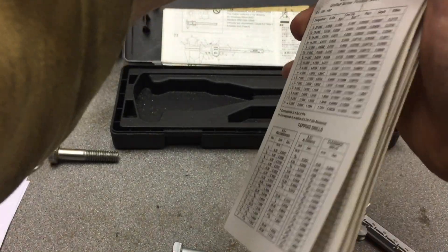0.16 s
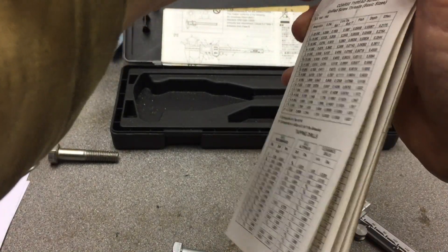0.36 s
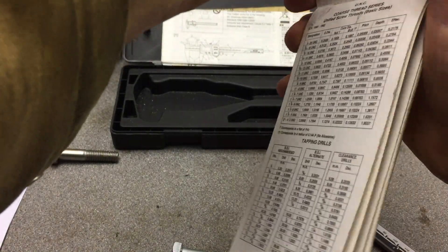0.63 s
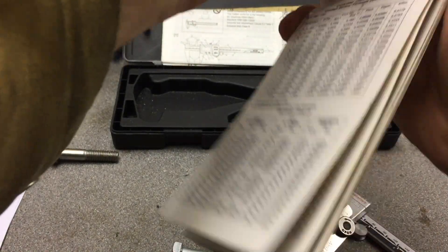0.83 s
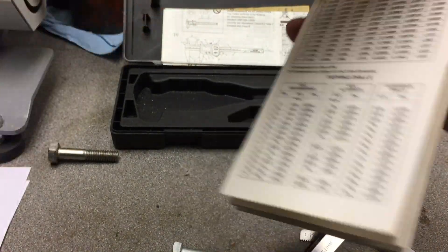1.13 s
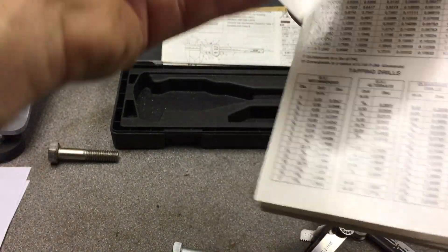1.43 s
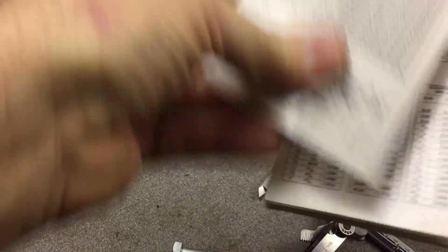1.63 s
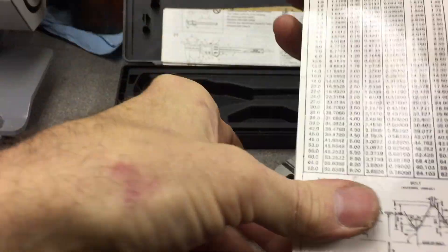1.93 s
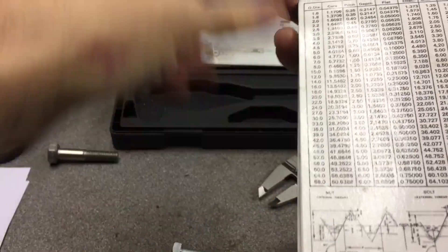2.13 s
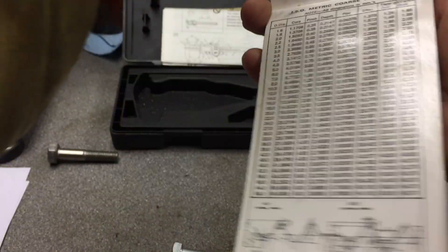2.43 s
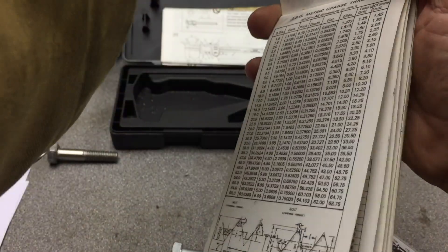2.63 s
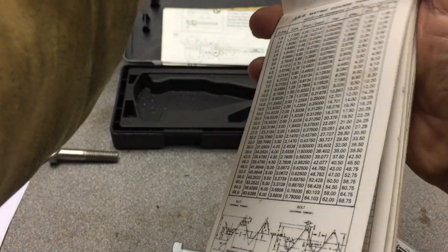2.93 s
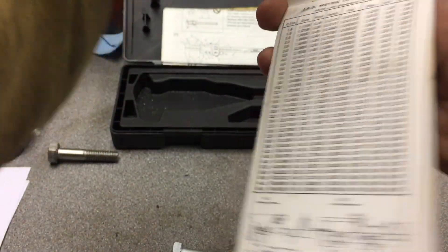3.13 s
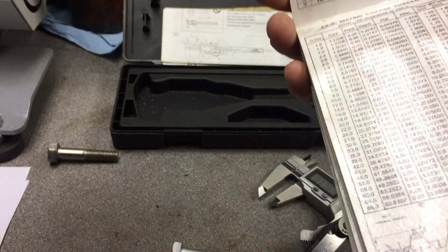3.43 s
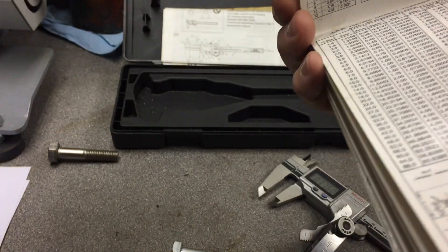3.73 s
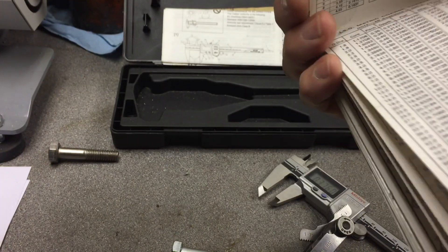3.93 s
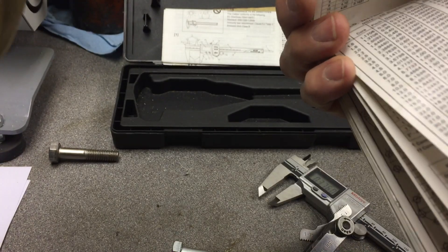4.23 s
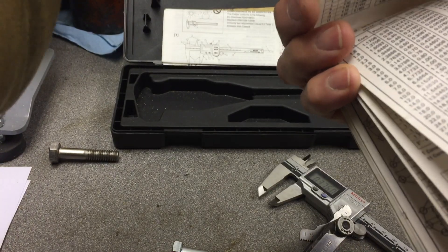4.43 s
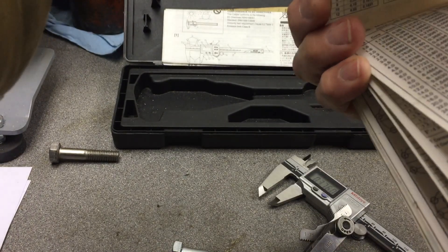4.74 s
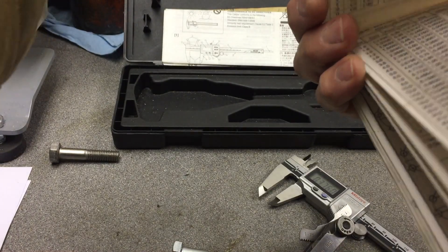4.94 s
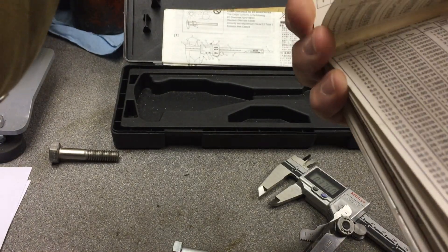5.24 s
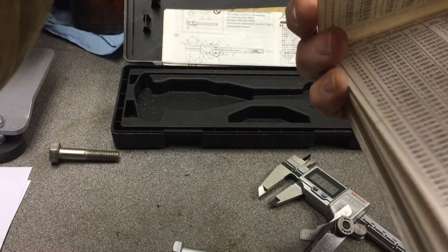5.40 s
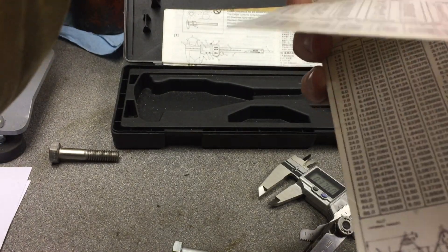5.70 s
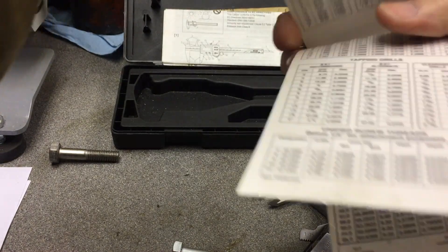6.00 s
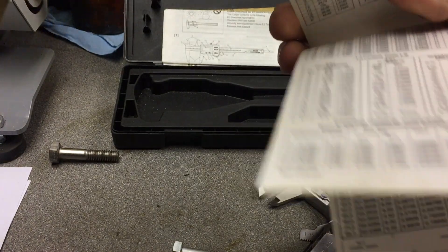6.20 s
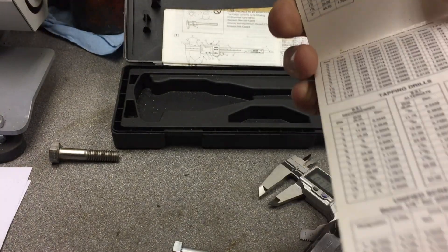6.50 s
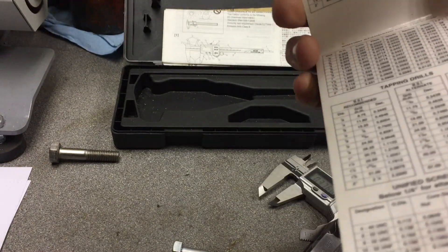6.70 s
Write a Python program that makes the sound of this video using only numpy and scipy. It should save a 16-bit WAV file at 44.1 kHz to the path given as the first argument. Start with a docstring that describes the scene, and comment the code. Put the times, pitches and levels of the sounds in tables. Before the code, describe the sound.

Thick pages slide, crackle and flap in short uneven strokes, heard close and dry with only a slight short room echo. A muffled buckle pops early, brisk scrapes follow, then a lull. Rustling resumes and thickens, with a hard snap and thump past the middle and more sharp ticks, before one loud dull pop and a few last rubs. Very quiet air noise and low hum lie beneath.

```python
"""A quiet workshop, where a stiff paper booklet is leafed through close to a microphone.
Thumbs and pages slide in short strokes (noise with crackle, coloured by the ringing sheet), pages flap air
(decaying low sines), paper snaps or scuffs briefly (short noise bursts) and bent sheets buckle (dull noise
bursts). Ventilation (shaped noise) and mains hum (wavering sines) fill the room, whose walls return an echo."""
import sys
import numpy as np
from scipy import signal
from scipy.fft import rfft, irfft, next_fast_len
from scipy.io import wavfile
from scipy.ndimage import uniform_filter1d, map_coordinates

SR = 44100
rng = np.random.default_rng(int(sys.argv[2]) if len(sys.argv) > 2 else 0)


def persist_wave(psi):
    """Save psi, clipped to +-1, as 16-bit WAV."""
    counts = np.round(np.clip(psi, -1, 1) * 32767).astype(np.int16)
    wavfile.write(sys.argv[1], SR, np.atleast_2d(counts).T)


N = 302526  # length [samples]


def amp(db):
    """Decibel law: the amplitude gain of a level in dB."""
    return 10 ** (np.asarray(db) / 20)


def unit(x):
    """Power normalisation: x scaled to rms 1."""
    return x / np.sqrt(np.mean(x ** 2, axis=-1, keepdims=True) + 1e-20)


def along(points, hz):
    """Logarithmic frequency scale: (Hz, value) points are joined by straight lines on it."""
    f, v = np.transpose(points)
    return np.interp(np.log(hz + 1), np.log(f + 1), v)


def wobble(rate):
    """Slow random modulation: a smooth curve through rate random knots a second."""
    knots = rng.standard_normal(int(N * rate / SR) + 4)
    return map_coordinates(knots, [np.arange(N) * rate / SR])


def filtered(x, response):
    """Linear filtering: the spectrum of x times a response of frequency."""
    m = next_fast_len(N + 8192)
    return irfft(rfft(x, m) * response(np.fft.rfftfreq(m, 1 / SR)), m)[..., :N]


def below(hz, edge_hz):
    """Low-pass law: a share near 1 under a soft edge and near 0 over it."""
    return 1 / (1 + (hz / edge_hz) ** 12)


def add(track, s, sound):
    """Superposition: a sound is mixed in at time s."""
    at = round(s * SR)
    track[..., at:at + sound.shape[-1]] += sound


def burst(t, rise, t60):
    """Transient envelope: a square-law climb to 1 over rise, then exponential decay by 60 dB in t60."""
    rise = max(rise, 1 / SR)
    climb = (t / rise) ** 2
    decay = amp(-60 * (t - rise) / max(t60, 1 / SR))
    return np.where(t < rise, climb, decay)


# Spectrum of the ventilation: (frequency [Hz], relative level per Hz [dB])
AIR_SPECTRUM = [(25, 0.5), (50, -6.5), (102, -2), (126, -12.5), (174, -4.5), (250, -12.5), (360, -14.5),
                (700, -20), (1400, -20), (2100, -19), (3000, -23), (4400, -23), (6000, -23.5), (15800, -33)]
# Partials of the mains hum: (frequency [Hz], peak level before wavering [dB], waver rate [1/s])
HUM_PARTIALS = [(49.7, -70.5, 8.5), (100.6, -66.5, 10)]
AIR_DB = -60.5  # rms level about which the ventilation drifts


def workshop():
    """Stationary sources: broadband flow noise, and hum partials modulated in level and phase."""
    drift_db = .5 * wobble(3)
    noise = rng.standard_normal(N)
    flow = unit(filtered(noise, lambda hz: amp(along(AIR_SPECTRUM, hz))))
    air = amp(AIR_DB + drift_db) * flow
    t, waver_db = np.arange(N) / SR, 2.5
    hum = np.zeros(N)
    for hz, db, rate in HUM_PARTIALS:
        level = amp(db + waver_db * wobble(rate))
        hum += level * np.sin(2 * np.pi * hz * t + 0.93 * wobble(rate))
    return air + hum


def patches(x, size, bins, frames, db):
    """Time-frequency modulation: random gain over patches of bins by frames, of standard deviation db."""
    z = signal.stft(x, nperseg=size)[2]
    field = rng.standard_normal(z.shape)
    field = uniform_filter1d(field, size=bins, axis=0)
    field = uniform_filter1d(field, size=frames, axis=1)
    return signal.istft(z * amp(db * field / field.std()), nperseg=size)[1]


def friction(grit_db, crackle_rate, crackle_db):
    """Stick-slip friction: fibres catch unevenly and crackle."""
    chance = crackle_rate * amp(3 * wobble(25)) / SR  # per sample; the crackling thickens and thins
    kicks = (rng.random(N) < chance) * amp(crackle_db + 3.2 * rng.random(N))
    crackle = signal.lfilter([1], [1, -.96], kicks)  # each crackle lasts about a millisecond
    grit = amp(grit_db * (wobble(700) + 0.51 * wobble(90)))
    fibres = rng.standard_normal(N) * (grit + crackle)
    # fine modes of the sheet, then broad colours of the contact
    fibres = patches(np.pad(fibres, (0, 2048)), size=1024, bins=2, frames=8, db=3.5)
    return patches(fibres, size=256, bins=3, frames=40, db=2.84)[:N]


# Colour of paper: (frequency [Hz], relative level per Hz [dB])
PAPER_SPECTRUM = [(180, -12), (300, -4.5), (700, -10.5), (1300, -7.5), (2000, -2.5), (3000, -6.5),
                  (5000, -12), (9000, -11), (13000, -21.5), (15800, -21.5)]
# Edges between belly, sheet, scrape and fizz: (belly top [Hz], sheet top [Hz], scrape top [Hz])
BAND_EDGES = (1200, 3200, 7000)


def paper_bands(x):
    """Band splitting: paper-coloured x as belly, sheet, scrape and fizz, each of rms 1."""
    def shares(hz):
        under = [0 * hz] + [below(hz, e) for e in BAND_EDGES] + [0 * hz + 1]
        power_shares = np.abs(np.diff(under, axis=0))
        return amp(along(PAPER_SPECTRUM, hz)) * np.sqrt(power_shares)
    return unit(filtered(x, shares))


HIGH_RING_SHARE = 0.84  # strength in dB of the high ring over that of the low one


def free_sheet(x, low_width, high_width):
    """Plate resonance: the free sheet rings in two bands that move with the grip from stroke to stroke."""
    hz, t, z = signal.stft(np.pad(x, (0, 256)), SR, nperseg=256)
    s, climb, hold, *_, low_hz, high_hz, low_db = np.transpose(SLIDES)
    knots = np.column_stack([s, s + hold]).ravel()

    def grip(v):
        """Constant through each hold, gliding between strokes."""
        return np.interp(t, knots, np.repeat(v, 2))

    ring_db = 0
    for centre, db, width in ((low_hz, low_db, low_width), (high_hz, HIGH_RING_SHARE * low_db, high_width)):
        distance = np.log((hz[:, None] + 1) / grip(centre)) / width
        ring_db = ring_db + grip(db) * (np.exp(-distance ** 2) - .2)  # lowers what lies off the ring
    return paper_bands(signal.istft(z * amp(ring_db), nperseg=256)[1][:N])


# Sliding strokes: (time of full strength [s], climb [s], hold [s], fade [s], sheet level [dB],
# scrape, fizz and belly levels over sheet [dB], low ring [Hz], high ring [Hz],
# rise of the low ring over frequencies far from it [dB])
SLIDES = [ (0.029, 0.044, 0.08, .03, -64, -4.5, -3, -2, 2050, 4570, 5.9),
          (.14, 0.014, 0.016, 0.027, -61.5, 4.5, 1, -0.5, 1960, 4000, 13),
          (0.184, .04, .003, 0.016, -57.5, -1, 7.5, 3.5, 2080, 4070, 6.8),
          (.272, 0.037, 0.049, 0.11, -65.5, -10, -4.5, -6, 2080, 3800, 9),
          (.614, 0.028, .003, 0.033, -66.5, 1.5, -2, 3.5, 2050, 4920, 8.2),
          (.845, 0.084, .01, .012, -58, -8, -9, -12, 2000, 4130, 12),
          (0.864, 0.019, 0.0033, 0.042, -45.5, -5, -6.5, -14, 2060, 4300, 11),
          (.915, 0.054, 0.13, 0.043, -50.5, 3.5, -3.5, -11.5, 2130, 4420, 20),
          (1.07, 0.043, 0.046, .02, -51.5, 4, -5, -10, 1990, 4700, 9),
          (1.135, 0.017, 0.012, .035, -42, -6, -4, -18, 1990, 4200, 6.8),
          (1.19, 0.023, 0.054, 0.024, -45, 4, -6.5, -11.5, 1860, 4670, 9.8),
          (1.337, 0.058, 0.055, 0.075, -52.5, -11, 4, -5, 1840, 5500, 12.2),
          (1.45, .05, 0.11, 0.071, -62, -7, 2.5, -4, 1850, 5300, 11),
          (1.697, 0.14, 0.01, 0.078, -53.5, -5, 0, -14.5, 2100, 5600, 5),
          (1.762, .04, 0.04, 0.046, -50.5, -11, -17, -24, 2310, 5030, 7.9),
          (1.806, 0.054, 0.009, 0.061, -44.5, -0.5, -2, -12.5, 2290, 4900, 6.4),
          (1.848, .06, 0.021, 0.048, -48, -6.5, -4, -32, 2650, 5950, 11),
          (1.974, 0.087, 0.0024, .08, -56.5, -14, 2, -30, 2600, 4300, 19),
          (2.554, 0.032, 0.037, 0.042, -41, -12.5, -12, -18, 1850, 3840, 8.6),
          (2.69, 0.056, .003, 0.014, -54.5, -9, -20, -9, 1900, 3670, 14),
          (2.835, 0.034, 0.0024, 0.023, -58, -7.5, -10, 3, 2030, 3880, 5.5),
          (2.898, 0.062, .003, 0.036, -55, -7.5, -25, -15, 1750, 3600, 15),
          (2.972, 0.014, 0.027, .02, -38, -26, -13, -9, 1940, 4330, 5.6),
          (3.01, 0.038, .002, 0.017, -35.5, -9, -7.5, -8.5, 1750, 4170, 8.5),
          (3.209, 0.027, .003, 0.11, -50, -4, -5, -4.5, 1750, 3870, 6),
          (3.278, 0.11, 0.0066, 0.071, -48.5, -3.5, -4.5, -13, 1890, 4270, 6),
          (3.332, 0.013, .002, 0.031, -37, -11.5, -10, -3.5, 1870, 5170, 12),
          (3.435, 0.19, .003, 0.11, -61, -6, -2, -12, 2120, 4560, 7.2),
          (3.57, 0.034, 0.014, 0.096, -52, -2, -11, -10.5, 2000, 4100, 4.3),
          (3.717, 0.083, 0.0027, .078, -49.5, 0.5, -14, -6, 2580, 4500, 11.3),
          (3.854, .07, .012, 0.071, -57.5, -0.5, -8, -28, 2150, 5500, 15),
          (3.906, 0.056, 0.032, 0.018, -56.5, -2.5, -11, -3, 1710, 4350, 11),
          (3.968, .02, .046, 0.11, -51.5, -10, -10.5, -13.5, 2030, 4220, 13),
          (4.083, 0.026, 0.034, 0.038, -47.5, -7.5, -11, -15.5, 2250, 5000, 7.6),
          (4.204, 0.097, .003, 0.15, -54, -2.5, -6.5, -7, 2150, 5100, 6),
          (4.282, 0.022, 0.023, 0.025, -42.5, -4.5, -3, -11.5, 2520, 4830, 8.7),
          (4.43, 0.036, 0.065, 0.014, -61, -15, -9.5, -12, 2000, 4100, 14),
          (4.558, 0.026, .015, .03, -47, -3, -12, -17, 2130, 3980, 6),
          (4.599, 0.046, 0.0022, 0.021, -37, -2.5, -8, -16, 2230, 3870, 6.2),
          (4.652, 0.023, .002, 0.011, -27, -1, -9.5, -5, 2280, 4630, 10.4),
          (4.706, .13, 0.036, .012, -47.5, 1, -5.5, -9, 2380, 4170, 6.8),
          (4.744, 0.0037, 0.0017, 0.012, -45, -15, -9, 12, 1640, 4300, 10),
          (4.76, .012, 0.041, 0.02, -57.5, 2, -17, -8, 2040, 4150, 3.8),
          (5.052, 0.084, 0.0084, 0.012, -39, 1.5, -4.5, -5.5, 2250, 4750, 6.3),
          (5.076, 0.0073, .002, 0.1, -47, -3, -3.5, -11, 2250, 5030, 7.2),
          (5.15, .03, 0.041, .02, -66, 2.5, -8, -11, 2550, 4400, 9.7),
          (5.22, 0.0043, .002, 0.013, -51, -8, -21, -2.5, 2070, 4100, 4.2),
          (5.24, .02, 0.058, .012, -65.5, -5, -8, -2.5, 2150, 4200, 8),
          (5.394, .025, .003, 0.037, -46, -8.5, -12, -13, 2270, 4480, 9.6),
          (5.452, 0.09, 0.0034, .03, -50.5, -4, -10, -12.5, 2110, 4240, 8),
          (5.512, .042, 0.0062, 0.016, -54, -4, -6, -5.5, 2210, 4570, 9),
          (5.534, 0.008, 0.0019, .03, -39, -9, -6, -13, 2200, 4340, 15),
          (5.625, 0.032, 0.026, 0.046, -48.5, -6.5, -6.5, -9, 2180, 4150, 7),
          (5.731, 0.01, .002, .055, -60, -7, -4, -11, 2400, 4100, 8.1),
          (5.922, 0.016, .02, .02, -38, -2.5, -10, -11.5, 1780, 4020, 6.9),
          (6.035, 0.0072, .002, 0.012, -44, -20, -22, -27, 3070, 4240, 13),
          (6.103, 0.059, 0.0077, 0.049, -46.5, -2.5, -1.5, -8.5, 2550, 4200, 6),
          (6.162, 0.099, 0.033, 0.013, -45, -4.5, -26, -25, 2520, 3380, 5),
          (6.286, 0.015, 0.012, 0.033, -43.5, -9, -20, -21, 2230, 4490, 4.8),
          (6.313, 0.035, 0.031, 0.064, -39, -3, -14, -12.5, 2250, 4700, 5.6),
          (6.42, 0.011, 0.039, 0.031, -41.5, -14, -16.5, -28.5, 2080, 4300, 5.9),
          (6.52, .05, 0.011, .03, -59, 0, -2, -11, 2290, 4140, 9.4),
          (6.558, 0.026, 0.0018, 0.0084, -40, -6, -4, 1, 2390, 4140, 9.6),
          (6.74, 0.032, .003, .05, -53.5, -11, -9, 1, 1860, 4470, 7),
          (6.77, .008, .002, .036, -48, -21, -14, -8, 2030, 4600, 9),
          (6.809, 0.041, 0.0034, 0.052, -43.5, -12, -1, -4.5, 1800, 4870, 7.2)]
STROKE_RANGE_DB = 20  # a stroke gains this much over its climb and loses it over its fade


def strokes():
    """Incoherent addition of sliding friction: strokes climb, hold and fade, and overlaps add in power."""
    power, t = np.zeros((4, N)), np.arange(N) / SR
    for s, climb, hold, fade, db, scrape_db, fizz_db, belly_db, *_ in SLIDES:
        near = slice(max(round((s - 3 * climb) * SR), 0), round((s + hold + 3 * fade) * SR))
        away = np.maximum((s - t[near]) / climb, (t[near] - s - hold) / fade).clip(0)
        band_db = db + np.array([[belly_db], [0], [scrape_db], [fizz_db]])
        power[:, near] += amp(band_db - STROKE_RANGE_DB * away) ** 2
    rubbing = friction(grit_db=1.5, crackle_rate=70, crackle_db=3.0)
    bands = free_sheet(rubbing, low_width=0.21, high_width=0.21)
    return np.sum(np.sqrt(power) * bands, axis=0)


# Reverberation of the room: (frequency [Hz], t60 [s])
ROOM_DECAY = [(200, 0.24), (1500, 0.19), (4000, 0.13), (10000, 0.098)]


def room(x):
    """Reverberation: each frequency of the walls' answer dies at its own speed."""
    hz, t, z = signal.stft(rng.standard_normal(SR // 2), SR, nperseg=256)
    decay = amp(-60 * t / along(ROOM_DECAY, hz)[:, None])
    tail = signal.istft(z * decay, SR, nperseg=256)[1]
    delayed = np.pad(x, (250, 0))  # the echo starts 250 samples late
    return signal.fftconvolve(delayed, tail / np.linalg.norm(tail))[:N]


# Pages pushing air: (onset time [s], scale of the push [dB], pitch of the push [Hz])
AIR_PUSHES = [(0.141, -42, 194), (.662, -36, 173), (.693, -31, 237), (.915, -49, 134), (1.177, -36, 172),
              (1.817, -44, 187), (2.46, -40, 180), (2.537, -40.5, 278), (2.865, -37.5, 155),
              (2.967, -44, 128), (3.084, -42, 195), (3.213, -46, 246), (3.287, -35.5, 190),
              (3.591, -43, 236), (3.901, -36, 304), (3.921, -40, 260), (4.547, -48, 181),
              (4.619, -29.5, 209), (4.65, -21.5, 188), (4.656, -33, 58), (4.665, -31, 94),
              (4.742, -44, 233), (5.038, -40, 234), (5.077, -33.5, 179), (5.09, -49, 59.3),
              (5.16, -42, 142), (5.214, -37.5, 220), (5.237, -51, 55), (5.532, -49, 270),
              (5.914, -42.5, 300), (5.985, -44.5, 111), (6.096, -38, 280), (6.205, -36.5, 186),
              (6.565, -28.5, 105), (6.607, -22.5, 210), (6.82, -36.5, 180)]
PUSH_RISE_TURNS, PUSH_T60_TURNS = 0.8, 7.1  # the push climbs and dies in so many of its own cycles
# the slower swing after it; level and pitch are relative to the push
SWING_RISE_S, SWING_T60_S, SWING_DB, SWING_PITCH = 0.0106, 0.072, -11, 0.628


def flaps():
    """Damped oscillation: a low push of air; the page then swings on more weakly and more slowly."""
    out, t = np.zeros(N + SR), np.arange(SR // 3) / SR
    for s, db, hz in AIR_PUSHES:
        push = burst(t, PUSH_RISE_TURNS / hz, PUSH_T60_TURNS / hz) * np.sin(2 * np.pi * hz * t)
        phase = 2 * np.pi * SWING_PITCH * hz * t + rng.uniform(0, 2 * np.pi)
        swing = burst(t, SWING_RISE_S, SWING_T60_S) * np.sin(phase)
        add(out, s, amp(db) * (push + amp(SWING_DB) * swing))
    return out[:N]


# Short paper cracks and brief scuffs; abrupt rises are snaps, slow rises are very short rubs:
# (time of full strength [s], sheet level [dB], scrape, fizz and belly levels over sheet [dB],
# rise [s], t60 before the factor of each band [s])
CRACKS_AND_SCUFFS = [(0.6609, -45, -15, -9, 6, 0.00074, 0.048), (0.861, -45, -2, -11, -25, 0.0015, 0.01),
                     (1.082, -41.5, 1.5, -12, -7, 0.011, 0.04), (1.1297, -35, -16, -2, -20, 0.0021, 0.016),
                     (1.1807, -32.5, 2.5, 3.5, -9.5, 0.0071, 0.042),
                     (2.454, -54, -21, -5, -3, 0.0017, 0.076), (2.868, -47.5, -19, -12, -6, 0.0023, 0.023),
                     (2.9664, -30.5, -21, -9, -7.5, 0.0016, 0.022),
                     (3.0038, -37, -25, -13, -2, 0.0062, 0.053),
                     (3.0845, -56.5, -22, 6, 7.5, 0.0023, 0.021),
                     (3.216, -48.5, -21, -15, 4.5, 0.018, 0.011),
                     (3.286, -44.5, -10, 4, 11.5, 0.00092, 0.0076),
                     (3.3327, -43, -21, -17, 4.5, 0.0024, 0.028),
                     (3.4953, -52, -16, 12, -13, 0.0026, 0.032),
                     (3.5632, -48, -14, -15, -16, 0.0045, 0.008), (3.936, -52, -10, 3, -8, 0.0052, 0.0052),
                     (3.971, -46, -20, -23, -27, 0.0021, 0.012),
                     (3.9873, -42, -19, -23, -27, 0.0025, 0.033),
                     (4.599, -41.5, -7, -13, -4, 0.0064, 0.042),
                     (4.6156, -21, -1, -14, -16.5, 0.011, 0.024), (4.632, -40.5, 1, -4, 11.5, 0.006, 0.019),
                     (4.6489, -27, -14, -22, 3, 0.0039, 0.0095), (4.6562, -41.5, 12, 3, 9, 0.0073, 0.032),
                     (4.7405, -27.5, 3.5, -4.5, 0, 0.006, 0.0073),
                     (5.036, -35.5, 2, -3, -3.5, 0.005, 0.086), (5.055, -31.5, 0.5, 2, -13, 0.014, 0.016),
                     (5.0687, -31, 4, 12, -24, 0.00073, 0.0044), (5.161, -52.5, -8, -17, 7, 0.0014, 0.017),
                     (5.192, -57.5, 0, 7.5, -13, 0.00128, 0.12),
                     (5.2147, -37, -15, -11, -9.5, 0.0046, 0.014),
                     (5.3022, -53, 6, -1, -12, 0.00067, 0.004),
                     (5.5275, -24.5, -18.5, -13.5, -18.5, 0.0034, 0.03),
                     (5.6331, -36.5, -1, -5.5, -7, 0.0054, 0.015),
                     (5.6695, -43, -6, -14, -10, 0.00076, 0.026),
                     (5.733, -52.5, -2, -4, -20, 0.0042, 0.011), (5.7547, -55, -15, 4.5, -2, 0.0037, 0.016),
                     (5.985, -53, -8, 0, -2, 0.00046, 0.026), (6.029, -39.5, -11, -27, -25, 0.00055, 0.01),
                     (6.205, -41, -1, -5, -4, 0.00056, 0.021), (6.286, -43, -9, -18, -24, 0.0021, 0.016),
                     (6.534, -22.5, -10, -7, -26, 0.00084, 0.01),
                     (6.5547, -29, -2, 11.5, 3, 0.00057, 0.028), (6.762, -35, -13, -8, -8, 0.0017, 0.023),
                     (6.802, -43, -11, -6, 0, 0.00193, 0.025), (6.8177, -42.5, -3.5, 7.5, -2.5, 0.03, 0.03)]


def snaps_and_scuffs():
    """Transient excitation: short bursts of the same sheet, whose low end outlasts its treble a little."""
    out, t = np.zeros(N + SR), np.arange(SR // 8) / SR
    sheet = free_sheet(rng.standard_normal(N), low_width=0.29, high_width=0.18)
    sheet = np.pad(sheet, ((0, 0), (0, SR)))
    for s, db, scrape_db, fizz_db, belly_db, rise, t60 in CRACKS_AND_SCUFFS:
        # t60 factors of belly, sheet, scrape and fizz
        shapes = np.array([burst(t, rise, t60 * k) for k in (1.2, 0.78, 1.0, 0.31)])
        bands = shapes * sheet[:, round(s * SR):][:, :len(t)]
        # each band gets the energy of its envelope
        bands *= np.linalg.norm(shapes, axis=1, keepdims=True) / np.linalg.norm(bands, axis=1, keepdims=True)
        band_gains = amp(db + np.array([belly_db, 0, scrape_db, fizz_db]))
        add(out, s - rise, band_gains @ bands)
    return out[:N]


# Bent sheets buckling: (onset time [s], peak level [dB], rise [s], t60 [s], pitch factor [1])
BUCKLES = [(0.6913, -16.5, 0.0049, 0.051, 1.06), (6.6044, -7, 0.0047, 0.026, 1.014)]
# Dull colour of a bent sheet at pitch factor 1: (frequency [Hz], relative level per Hz [dB])
BENT_SHEET_SPECTRUM = [(60, -18), (215, -5), (450, -8.5), (680, -12), (820, -2), (1020, -10.5),
                       (1240, -2.5), (1450, -3), (1800, 1), (2300, -16), (3200, -18.5), (4000, -42),
                       (6000, -51), (16000, -53)]


def pops():
    """Buckling: a jolt starts it, it runs across the sheet for milliseconds and sounds in its dull colour."""
    out, t = np.zeros(N + SR), np.arange(8192) / SR
    hz = np.fft.rfftfreq(len(t), 1 / SR)
    lead = 441  # samples of room ahead of the onset for the filter's spread
    for s, db, rise, t60, pitch in BUCKLES:
        jolt = 0.35 * (t < rise)
        push = np.maximum(burst(t, rise, t60), jolt) * rng.standard_normal(len(t))
        pop = irfft(rfft(np.roll(push, lead)) * amp(along(BENT_SHEET_SPECTRUM, hz / pitch)))
        add(out, s - lead / SR, amp(db) * pop / np.abs(pop).max())
    return out[:N]


def scene():
    """Direct and reverberant sound: rubs, snaps and flaps feed the echo at one level, pops slightly lower."""
    near = strokes() + snaps_and_scuffs() + flaps()
    buckles = pops()
    echo = room(amp(-18) * near + amp(-19.5) * buckles)
    return (near + buckles + echo + workshop())[None]


# Dips where the body around the microphone shades it: (centre [Hz], width [Hz], depth [dB])
SHADING_DIPS = [(4850, 220, -4), (7640, 950, -4), (10340, 330, -5)]
TOP_HZ = 15900  # band limit


def record(dry):
    """Transfer function of the microphone: shading dips, a bass cut and nothing above the band limit."""
    def response(hz):
        dips_db = sum(db * np.exp(-((hz - c) / w) ** 2) for c, w, db in SHADING_DIPS)
        bass_cut = 1 - below(hz, 40.0)
        return amp(dips_db) * bass_cut * (hz < TOP_HZ)
    return filtered(dry, response)


dry = scene()
out = record(dry)
persist_wave(out)
```